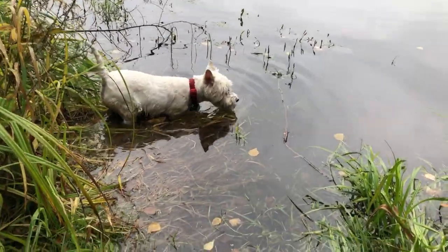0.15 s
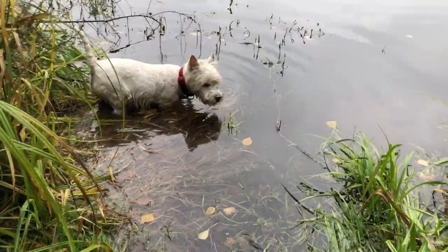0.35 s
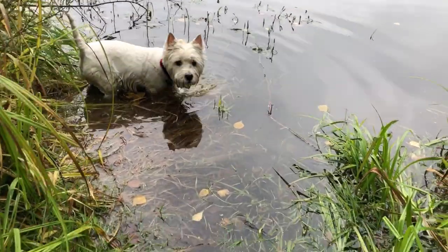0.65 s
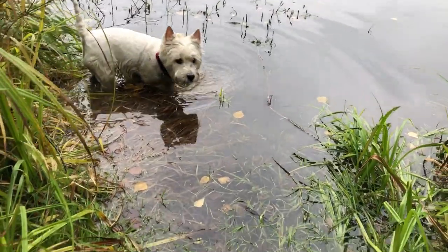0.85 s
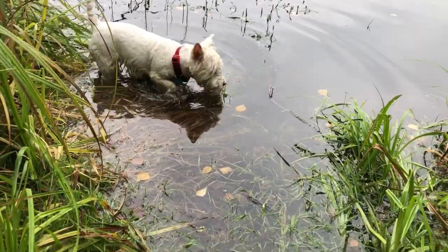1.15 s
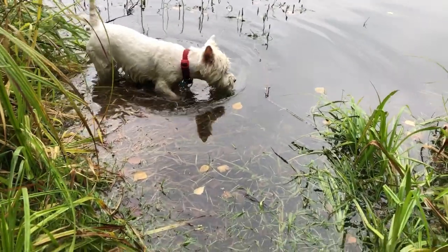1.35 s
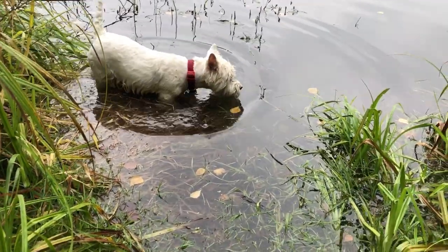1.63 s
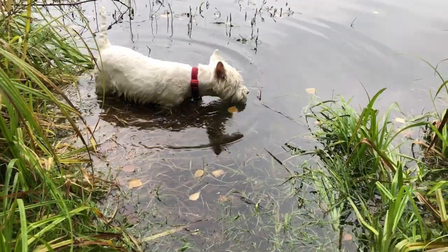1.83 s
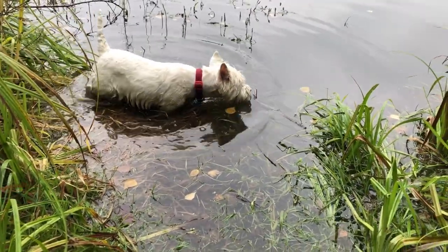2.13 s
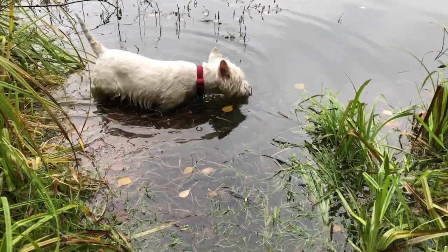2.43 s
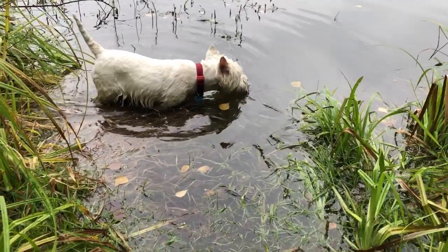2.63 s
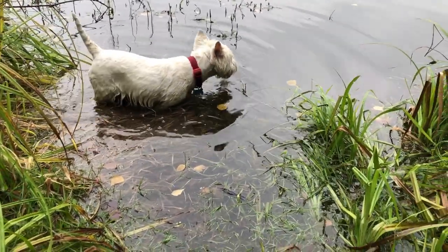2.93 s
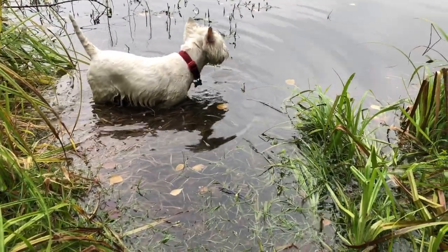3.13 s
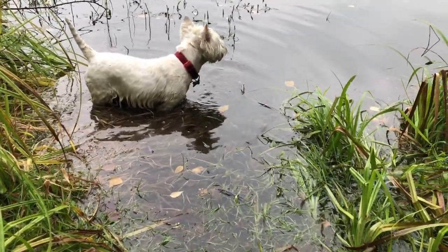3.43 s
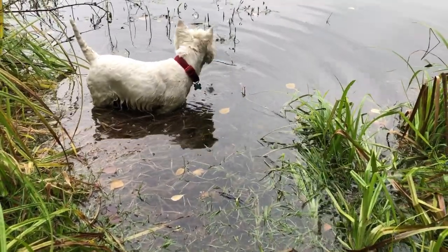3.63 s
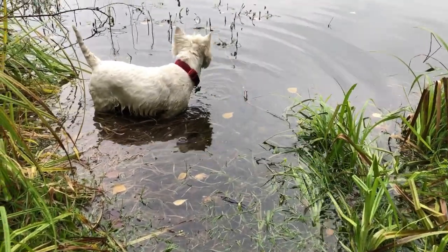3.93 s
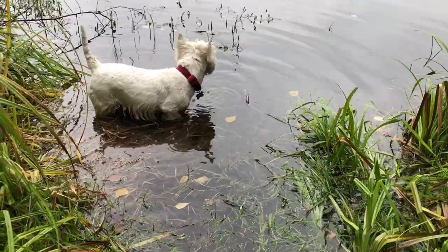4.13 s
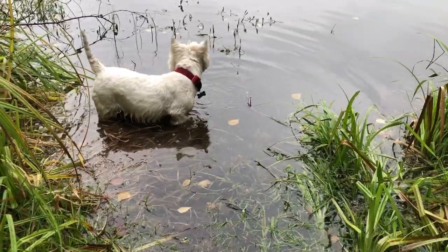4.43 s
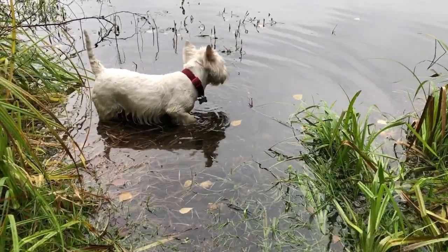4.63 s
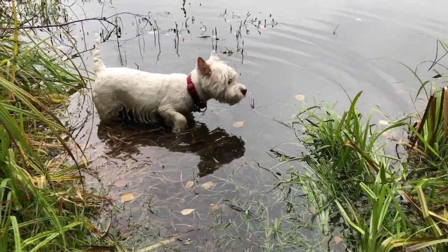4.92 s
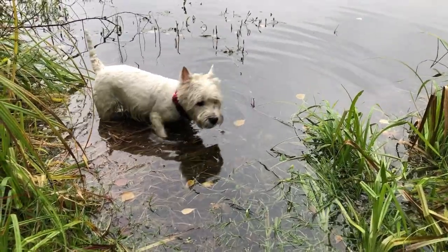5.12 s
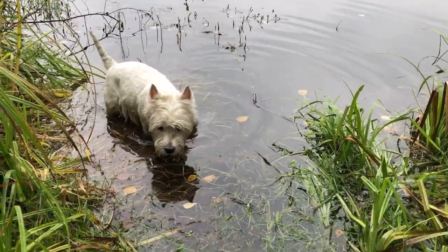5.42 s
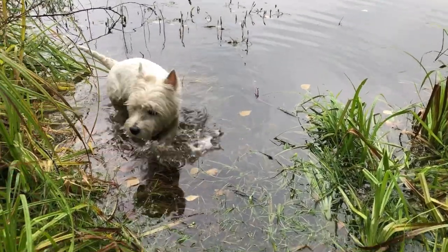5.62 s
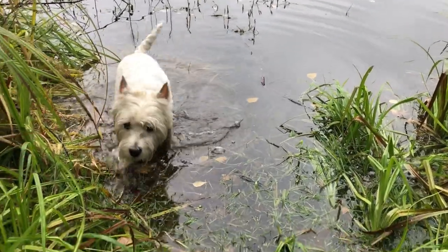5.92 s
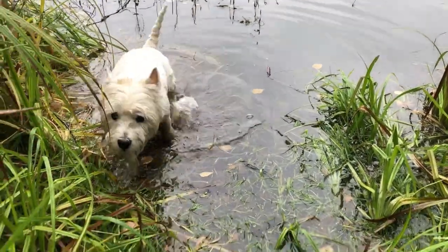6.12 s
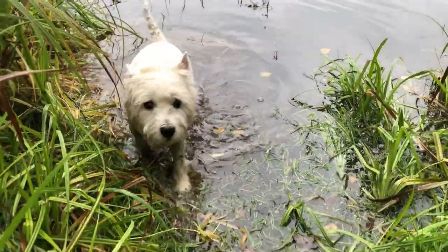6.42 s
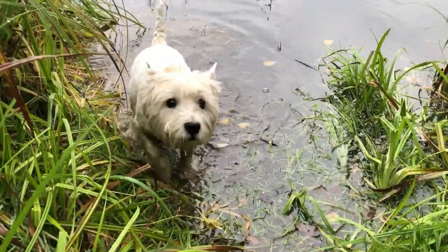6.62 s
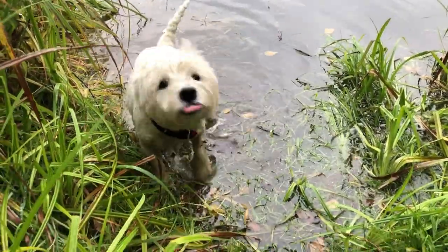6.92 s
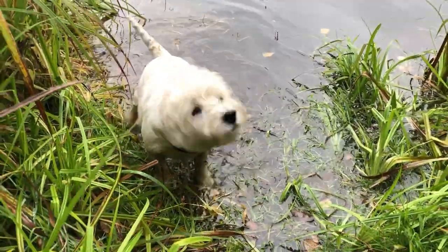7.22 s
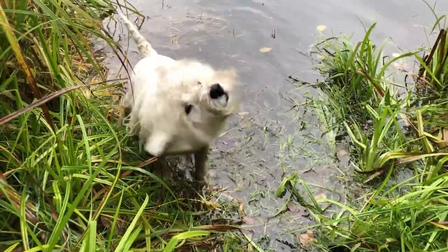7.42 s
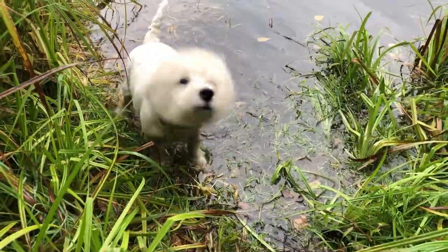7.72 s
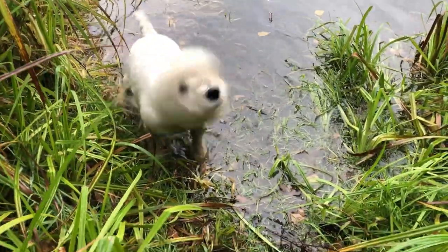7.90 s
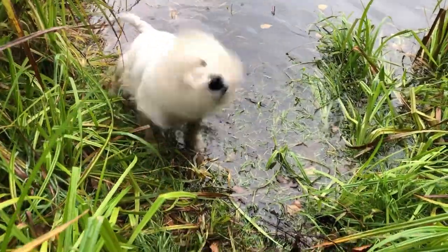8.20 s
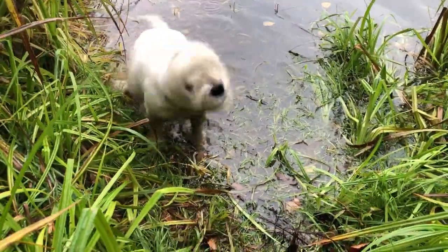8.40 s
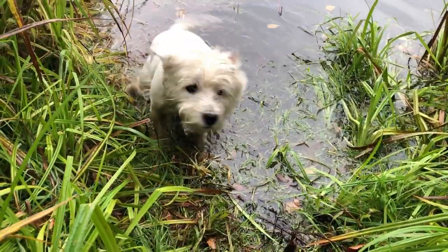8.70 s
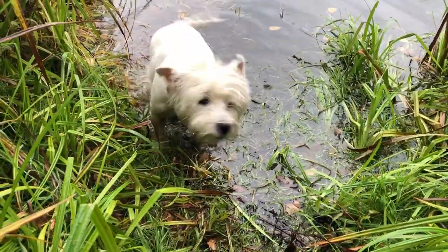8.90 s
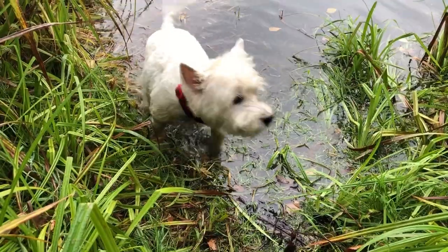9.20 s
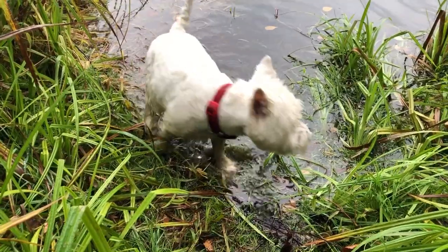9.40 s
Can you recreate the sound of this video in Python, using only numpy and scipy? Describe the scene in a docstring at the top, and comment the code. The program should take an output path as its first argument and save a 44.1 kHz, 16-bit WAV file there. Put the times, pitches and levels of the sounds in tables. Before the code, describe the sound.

Sparse gurgles and plops in a quiet pond give way to splashing steps, then a dog's spattering shake, ear slaps and metal tag jingles.

```python
"""A small dog wades in a shallow pond, climbs towards the grassy bank and shakes itself dry.
First its legs stir up gurgling bubbles, and single drops plop and splat; bigger steps then throw up spray.
Near the end metal collar tags jingle, wet ears clap and water flies off as the dog shakes.
Far traffic and leaves sound throughout. Bubbles and tags are sines; spray, splats and air are shaped noise,
with swarms of tiny bubbles in the water."""
import sys
import numpy as np
from scipy import signal
from scipy.fft import rfft, irfft, next_fast_len
from scipy.io import wavfile
from scipy.ndimage import map_coordinates

SR = 44100
rng = np.random.default_rng(int(sys.argv[2]) if len(sys.argv) > 2 else 0)


def volts_from_decibels(level):
    """Turn decibel levels (scalar or array-like) into linear amplitude factors."""
    exponent = np.asarray(level, float) / 20
    return 10 ** exponent


def dump_mix(stems):
    """Bounce the given channels to the path in sys.argv[1] as a 16-bit WAV at rate SR."""
    frames = np.atleast_2d(stems).T  # one column per channel
    limited = np.clip(frames, -1, 1)  # hard clip at full scale
    pcm = np.round(limited * 32767).astype(np.int16)
    wavfile.write(sys.argv[1], SR, pcm)


N = 421155  # length of the scene in samples

# colour of flying spray: (frequency [Hz], relative level [dB])
SPRAY_COLOUR = [(700, -30), (1500, 0), (3000, -0.5), (6000, -2), (9000, -16), (13000, -38)]


def unit(x):
    """Scales x to an rms of 1."""
    return x / np.sqrt(np.mean(x ** 2) + 1e-20)


def coloured(x, points):
    """Filters x through a spectrum given as (frequency [Hz], level [dB]) points."""
    size = next_fast_len(N + 8192)
    hz, db = np.transpose(points)
    bins = np.fft.rfftfreq(size, 1 / SR)
    curve_db = np.interp(np.log(bins + 1), np.log(hz + 1), db)
    return irfft(rfft(x, size) * volts_from_decibels(curve_db), size)[:N]


def coloured_noise(points):
    """Steady random noise of the given colour, at rms 1."""
    return unit(coloured(rng.standard_normal(N), points))


def wobble(rate):
    """A smooth random curve through `rate` random points a second."""
    knots = rng.standard_normal(int(N * rate / SR) + 4)
    return map_coordinates(knots, [np.arange(N) * rate / SR])


def laid(start, rows):
    """Adds each row of samples in at its start time [s]."""
    first = np.round(start * SR).astype(int)[:, None]
    at = (first + np.arange(rows.shape[1])).clip(0, N)
    return np.bincount(at.ravel(), rows.ravel(), N + 1)[:N]


def ramps(start, end, db, rise_db_per_s, fall_db_per_s):
    """Gain of events that rise to their level, hold it from start to end and fall away; powers add."""
    t = np.arange(0, N + 64, 64) / SR  # every 64 samples is fine enough
    early = np.maximum(start[:, None] - t, 0)
    late = np.maximum(t - end[:, None], 0)
    rise = np.reshape(rise_db_per_s, (-1, 1)) * early
    fall = np.reshape(fall_db_per_s, (-1, 1)) * late
    together = np.linalg.norm(volts_from_decibels(db[:, None] - rise - fall), axis=0)
    return np.interp(np.arange(N) / SR, t, together)


def bubbles(start, gain, hz, glide, swell, life, size):
    """Sines that swell, die by 13 dB within their life, and glide as the air pocket changes shape."""
    t = np.arange(size) / SR
    hz, glide = hz[:, None], glide[:, None]
    swell, life = swell.clip(1e-4)[:, None], life.clip(2e-4)[:, None]
    pitch = hz * 2 ** (glide * np.minimum(t / life, 1.1))  # glide in octaves per life
    rising = np.sin(np.pi / 2 * np.minimum(t / swell, 1)) ** 2
    since_swell = np.maximum(t - swell, 0) / np.maximum(life - swell, .3 * life)
    dying = volts_from_decibels(-13 * since_swell ** 1.45)
    tone = np.sin(2 * np.pi * np.cumsum(pitch, 1) / SR)
    return laid(start, gain[:, None] * rising * dying * tone)


def swarm(count, hz, spread, cycles, scatter_db, size):
    """Bubbles at random times with pitches scattered around hz, a few much louder than the rest; rms 1."""
    when, long, loud, glide = rng.random((count, 4)).T
    pitch = np.clip(hz * np.exp(spread * rng.standard_normal(count)), 250, 15500)
    gain = volts_from_decibels(-scatter_db * np.log(1 - loud).clip(-2.5, 0))
    life = cycles * (0.35 + long) / pitch  # high bubbles are short
    return unit(bubbles(when * N / SR, gain, pitch, .55 * (glide - .4), 0.19 * life, life, size))


def stirred_water():
    """Legs and shaken fur stir the water: gurgling bubbles on a wash, droplets and fine mist in clumps."""
    # how busy the water is between single splashes, before random surges:
    # (time [s], gurgle level [dB], spray level [dB], mist above spray [dB])
    bustle = [(0.0, -68.5, -71, 3), (1.0, -73, -77, 2), (2.2, -74, -86, 10), (3.2, -72, -80, 7),
              (4.0, -74, -93, 9), (5.44, -74, -93, 9), (5.52, -63, -59, -4), (6.02, -63, -61, -6),
              (6.25, -61, -57, -2), (6.45, -65, -63, -2), (6.85, -72, -67, 0), (7.08, -74, -71, 8),
              (7.45, -71, -70, 5), (7.9, -58, -62, 5), (8.15, -63, -66, 4), (8.45, -60, -60, 1),
              (9.1, -62, -62, 2), (9.4, -74, -65, 2), (9.55, -70, -61, 7)]
    # a leg drags air under: (start [s], length [s], gurgle level [dB])
    strides = [(1.1, .15, -59), (1.665, .07, -53), (1.76, .03, -62), (2.42, .03, -60), (2.70, .02, -57),
               (5.51, .21, -50), (5.93, .05, -61), (6.07, .18, -59), (6.38, .03, -57.5), (6.56, .03, -57),
               (6.94, .03, -55), (8.675, .075, -50.5), (8.79, .03, -55)]
    # water thrown up by a leg or a swing of the shaking body:
    # (time of peak [s], spray level [dB], mist above spray [dB], time to fall by 10 dB [s])
    throws = [(1.11, -67, 0, .04), (1.68, -63, -9, .07), (1.805, -62, -12, .02), (2.462, -61, -10, .05),
              (2.705, -58, -14, .045), (4.08, -62, -14, .03), (4.15, -66, 2, .075), (4.835, -73, 0, .12),
              (5.26, -63, -2, .055), (5.635, -51, 3, .04), (5.745, -46, -3, .075), (5.915, -51.5, -1, .05),
              (5.99, -46, 0, .022), (6.33, -52, 3.5, .08), (6.385, -45.5, -5, .045), (6.55, -50.5, 2, .07),
              (6.675, -54, 4, .07), (6.87, -59, 5, .04), (6.965, -49.5, -6, .045), (7.225, -60, 0, .09),
              (7.65, -57, 1, .09), (7.89, -52.5, 7, .12), (8.05, -54, 4.5, .08), (8.225, -50.5, 3, .1),
              (8.365, -52, 0, .05), (8.455, -51, -2, .06), (8.59, -48, -1, .09), (8.81, -50, -3, .04),
              (8.93, -51, 0, .045), (9.02, -50.5, 1.5, .07), (9.245, -52, -3, .04), (9.331, -51, -2, .045)]
    # colours of mist and gurgle: (frequency [Hz], relative level [dB])
    mist_colour = [(3000, -13), (7000, -1.5), (12000, 1.5), (16000, 2.5)]
    gurgle_colour = [(200, -37), (400, -4), (1500, 5.5), (3000, -23.5), (5000, -39)]
    stride_rise_db_per_s, stride_fall_db_per_s = 500, 240
    throw_rise = .55  # rise time over fall time

    t = np.arange(N) / SR
    s, churn_db, spray_db, mist_over = np.transpose(bustle)
    start, length, stride_db = np.transpose(strides)
    peak, throw_db, throw_mist_over, fall = np.transpose(throws)

    def thrown(db):
        """Gain of all the throws at the given levels."""
        return ramps(peak, peak, db, 10 / (throw_rise * fall), 10 / fall)

    stepped = ramps(start, start + length, stride_db, stride_rise_db_per_s, stride_fall_db_per_s)
    churned = np.hypot(volts_from_decibels(np.interp(t, s, churn_db)), stepped)
    sprayed = np.hypot(volts_from_decibels(np.interp(t, s, spray_db)), thrown(throw_db))
    misted = np.hypot(volts_from_decibels(np.interp(t, s, spray_db + mist_over)), thrown(throw_db + throw_mist_over))

    wash = coloured_noise(gurgle_colour)
    trapped_air = swarm(count=4500, hz=950, spread=0.55, cycles=8, scatter_db=2.8, size=900)
    gurgle = unit(trapped_air + 0.55 * wash)
    droplets = swarm(count=6000, hz=3900, spread=0.5, cycles=11, scatter_db=5, size=400)
    crackle = swarm(count=2000, hz=3300, spread=0.45, cycles=2.2, scatter_db=6, size=100)
    fizz = swarm(count=4000, hz=12000, spread=0.3, cycles=7, scatter_db=5.5, size=120)

    clumps = 3 * wobble(130)  # [dB] drops land in quick bunches, shared by patter and hiss
    patter_noise = volts_from_decibels(clumps + 2.45 * wobble(60)) * rng.standard_normal(N)
    patter = unit(coloured(patter_noise, SPRAY_COLOUR))
    hiss_noise = volts_from_decibels(clumps + 1.85 * wobble(60)) * rng.standard_normal(N)
    hiss = unit(coloured(hiss_noise, mist_colour))
    spray = unit(patter + 1.4 * droplets + 0.8 * crackle)
    mist = unit(hiss + 0.5 * fizz)

    surge = volts_from_decibels(.8 * wobble(25))  # spray and mist surge together
    return churned * volts_from_decibels(2.17 * wobble(30)) * gurgle + surge * (sprayed * spray + misted * mist)


def plops():
    """Single bubbles that stand out: each starts with a wet smack and flutters in the rough surface."""
    # big bubbles and plops, before the flutter:
    # (time [s], peak level [dB], start pitch [Hz], glide [octaves], life [s])
    plop_table = [(0.6167, -54, 1450, 0.055, 0.016), (0.698, -57, 1600, 0.4, 0.016),
                  (0.894, -53, 3050, 0.03, 0.004), (1.0697, -46, 1520, -0.15, 0.016),
                  (1.1095, -43.5, 760, -0.15, 0.023), (1.1502, -47, 1005, 0.18, 0.013),
                  (1.171, -39.5, 1020, -0.098, 0.011), (1.1896, -53, 618, 1.5, 0.027),
                  (1.207, -38, 1804, 0.14, 0.0052), (1.2884, -47, 1585, 0.27, 0.03),
                  (1.643, -51, 2800, 0.05, 0.005), (1.667, -44, 610, 0.1, 0.008),
                  (1.703, -38.5, 650, -0.37, 0.0055), (1.733, -52, 1900, 0.1, 0.012),
                  (1.798, -48, 2900, 0.3, 0.008), (1.9267, -46, 1980, 0.063, 0.0076),
                  (2.444, -45, 950, 0.19, 0.0044), (2.464, -49, 4200, 0.2, 0.003),
                  (2.472, -50, 2400, 0.1, 0.003), (2.693, -45, 566, 0.36, 0.013),
                  (3.005, -44, 700, 0.29, 0.0032), (3.0055, -51, 3300, 0.0, 0.003),
                  (3.1668, -53, 1150, -0.029, 0.018), (3.288, -54.5, 1400, 1.65, 0.026),
                  (3.539, -50, 1640, 0.23, 0.012), (4.0987, -40.5, 1016, -0.089, 0.006),
                  (5.1427, -40, 960, -0.083, 0.003), (5.259, -38, 1890, 0.11, 0.0036),
                  (5.473, -50, 800, -0.1, 0.02), (5.511, -30, 650, -0.2, 0.008),
                  (5.5205, -38, 480, -0.3, 0.016), (5.553, -39, 630, -0.24, 0.0299),
                  (5.5485, -34.5, 1520, 0.15, 0.0083), (5.5953, -44, 906, -0.27, 0.0098),
                  (5.608, -36, 765, 0.26, 0.008), (5.6168, -36, 1183, 0.056, 0.0055),
                  (5.629, -43, 3300, 0.05, 0.005), (5.648, -38, 390, 0.05, 0.028),
                  (5.727, -43, 900, 0.1, 0.008), (5.753, -39, 3150, 0.1, 0.005),
                  (5.781, -41, 2750, 0.15, 0.005), (5.841, -40, 3120, 0.078, 0.006),
                  (6.069, -43, 1470, 0.6, 0.0062), (6.123, -39, 1400, 0.9, 0.01),
                  (6.163, -38.5, 650, 1.2, 0.0073), (6.105, -47, 720, 0.0, 0.02),
                  (6.188, -47, 1100, 0.3, 0.02), (6.212, -47, 750, 0.0, 0.025),
                  (6.2485, -27, 1340, -2.06, 0.0061), (6.2515, -30, 480, -0.6, 0.014),
                  (6.385, -41, 1017, -0.09, 0.006), (6.4155, -46, 1220, -0.26, 0.015),
                  (6.573, -49, 1919, 0.0, 0.015), (6.724, -43.5, 2300, -0.11, 0.0035),
                  (6.786, -45, 2180, -0.17, 0.006), (6.9501, -18, 1800, -0.4, 0.0016),
                  (6.953, -40, 1300, -1, 0.006), (6.962, -42, 740, -0.63, 0.014),
                  (7.021, -47.5, 1500, 0.29, 0.014), (7.133, -50, 2220, 0.45, 0.013),
                  (7.284, -46.5, 1940, 0.0, 0.0038), (7.454, -45.5, 1990, 0.14, 0.005),
                  (8.098, -39.5, 2170, 0.1, 0.005), (8.365, -36.5, 2130, 0.26, 0.0078),
                  (8.372, -37, 1200, -0.086, 0.006), (8.472, -40, 1800, -0.1, 0.009),
                  (8.576, -30, 980, -0.15, 0.01), (8.59, -30, 2220, 0.17, 0.0042),
                  (8.629, -31.5, 1290, -0.066, 0.0022), (8.647, -28.5, 1170, 0.0, 0.0061),
                  (8.6503, -20.5, 586, -0.08, 0.014), (8.675, -33, 800, -0.1, 0.005),
                  (8.682, -31, 760, -0.1, 0.005), (8.706, -35, 760, -0.7, 0.013),
                  (8.725, -38, 480, 0.0, 0.006), (8.731, -42, 1150, 0.15, 0.011),
                  (8.736, -36, 620, -0.14, 0.012), (8.756, -32, 290, 1.1, 0.023),
                  (8.762, -45, 1700, 0.3, 0.007), (8.789, -42, 1150, 0.2, 0.006),
                  (8.8, -41, 1890, 1.0, 0.01), (8.816, -43.5, 810, 0.1, 0.0096),
                  (9.318, -23, 3900, -0.05, 0.005), (9.445, -44, 1110, 0.0, 0.0059)]
    s, db, hz, glide, life = np.transpose(plop_table)
    upward = glide.clip(0, 1)
    swell = life * (0.15 + 0.4 * upward ** 2)  # those that glide far up swell slowly
    smack_db = db - 16 - 12 * upward  # and smack more softly
    smack_fall = 60 * np.arange(800) / SR / 0.016  # 60 dB in 16 ms
    smack = laid(s, volts_from_decibels(smack_db[:, None] - smack_fall))
    flutter = volts_from_decibels(1.3 * wobble(300))
    ringing = bubbles(s, volts_from_decibels(db), hz, glide, swell, life, size=3000)
    return flutter * ringing + smack * coloured_noise(SPRAY_COLOUR)


def splats():
    """Each drop is a burst of noise: a sharp wide crack, and a duller part around the drop's own pitch."""
    # drops and slaps bursting on water and leaves, before a common lift of 1 dB:
    # (time [s], level [dB], centre frequency [Hz])
    splat_table = [(1.0682, -47, 3760), (1.7873, -45, 2600), (2.6932, -42, 2200), (3.6554, -54, 5200),
                   (5.1405, -54.5, 3520), (5.201, -48, 12000), (5.218, -54, 6500), (5.232, -53, 8500),
                   (5.242, -51, 14000), (5.2714, -36, 3600), (5.509, -42.5, 3550), (5.6438, -39, 2780),
                   (5.7059, -42, 5340), (5.7227, -38, 4810), (5.7418, -39, 5220), (5.876, -43, 5000),
                   (5.923, -36.5, 4090), (5.9755, -34, 5060), (6.3625, -47, 2800), (6.3774, -29, 2450),
                   (6.6811, -37.5, 5400), (6.79, -44.5, 9200), (6.851, -46, 11000), (6.990, -40, 12000),
                   (7.226, -36, 4100), (7.369, -46, 6440), (7.455, -42.5, 5350), (7.607, -46, 6430),
                   (7.86, -48, 3780), (8.0386, -31, 7460), (8.1354, -38, 5960), (8.209, -38, 2300),
                   (8.2287, -38, 3800), (8.249, -37, 7100), (8.2796, -31, 3600), (8.315, -37.5, 3700),
                   (8.335, -38, 2200), (8.356, -37, 4140), (8.4412, -29, 4300), (8.5655, -37, 2200),
                   (8.5874, -34.5, 7900), (8.628, -38, 2700), (8.6467, -33, 3200), (8.742, -38, 8000),
                   (8.9043, -37, 3860), (8.947, -30, 3850), (9.005, -38, 3500), (9.0488, -38, 2800),
                   (9.0982, -33.5, 7640), (9.206, -40, 3500), (9.3175, -25, 4600), (9.4397, -41.5, 4200)]
    s, db, hz = (c[:, None] for c in np.transpose(splat_table))
    t = np.arange(2048) / SR
    f = np.fft.rfftfreq(2048, 1 / SR) + 1
    own_pitch = np.exp(-(np.log(f / hz) / 0.42) ** 2)
    crack = 0.33 * f ** 2 / (f ** 2 + 4000 ** 2)
    noise = irfft(rfft(rng.standard_normal((len(s), len(t)))) * (own_pitch + crack))
    burst = (1 - np.exp(-(t / 0.00065) ** 2)) * volts_from_decibels(-60 * t / 0.021)
    noise *= burst
    # every burst gets the same energy before its level is set
    noise *= np.linalg.norm(burst) / np.linalg.norm(noise, axis=1, keepdims=True)
    return laid(s[:, 0], volts_from_decibels(db + 1.0) * noise)


def ear_flaps():
    """Wet ears slap the head: short hollow claps of one length, each with a rough slap of fur and a thud."""
    # ear slaps, a run about 0.08 s apart and two later ones:
    # (time [s], clap peak level [dB], clap pitch [Hz])
    flaps = [(7.992, -42, 900), (8.084, -43, 680), (8.173, -43, 660), (8.258, -37.5, 680),
             (8.34, -36.5, 690), (8.419, -39, 760), (8.496, -36.5, 670), (9.036, -42, 570),
             (9.126, -41, 643)]
    # colour of wet fur slapping: (frequency [Hz], relative level [dB])
    fur_colour = [(300, -30), (700, 0), (2000, -4), (5000, -20)]
    life_s, glide_octaves = .0048, -.12
    fur_db, fur_t60_s = -4, .02  # fur level relative to the clap
    thud_db, thud_hz = -10, 170  # thud level relative to the clap

    s, db, hz = np.transpose(flaps)
    life = np.full(len(s), life_s)
    clap = bubbles(s, volts_from_decibels(db), hz, 0 * s + glide_octaves, 0.2 * life, life, size=1000)
    thud = bubbles(s, volts_from_decibels(db + thud_db), 0 * s + thud_hz, 0 * s, 1.5 * life, 5 * life, size=2000)
    fur_fall = 60 * np.arange(1500) / SR / fur_t60_s
    slap = laid(s - .003, volts_from_decibels(db[:, None] + fur_db - fur_fall))  # the fur slaps 3 ms early
    return clap + thud + slap * coloured_noise(fur_colour)


def tags():
    """Thin metal tags knock together; each blow favours one mode and fur soon damps the ring."""
    # ways the metal rings: (frequency [Hz], time to fall by 60 dB [s], offset of a weaker twin [Hz])
    mode_table = [(11855, .065, 75), (3790, .2, 20), (10355, .08, 120), (15245, .08, -60), (8420, .1, 45)]
    # knocks, at nominal levels: (time [s], level of the favoured mode [dB], its rough frequency [Hz],
    # how far the others lie under it [dB], time until fur stops the ring [s])
    blows = [(7.04, -58, 8400, 25, 0.045), (7.075, -59, 3800, 28, 0.065), (7.12, -60, 11900, 4, 0.04),
             (7.175, -52, 3800, 23, 0.029), (7.226, -46, 3800, 8, 0.007), (7.232, -49, 10400, 9, 0.04),
             (7.325, -60, 15200, 4, 0.03), (7.43, -60, 8400, 20, 0.015), (7.484, -57, 3800, 4, 0.012),
             (7.61, -52, 11900, 14, 0.025), (7.666, -54, 3800, 5, 0.015), (7.773, -54, 3800, 12, 0.011),
             (7.815, -57, 10400, 12, 0.03), (7.835, -54, 3800, 15, 0.008), (7.861, -49.5, 3800, 10, 0.012),
             (8.135, -47, 15200, 10, 0.03), (8.251, -30, 11900, 5, 0.032), (8.266, -28.5, 11900, 12, 0.03),
             (8.365, -49, 10400, 5, 0.024), (8.48, -50, 10400, 4, 0.022), (8.508, -51, 10400, 12, 0.02),
             (8.547, -34.5, 11900, 12, 0.015), (8.594, -43.5, 8400, 18, 0.009),
             (8.743, -26.5, 11900, 19, 0.011), (8.785, -46, 10400, 18, 0.0073),
             (9.016, -48, 15200, 8, 0.05), (9.05, -55, 11900, 4, 0.034), (9.098, -41, 11900, 9, 0.016)]
    # span of light jingling: (from [s], to [s], loudest nominal level [dB])
    jingle_from, jingle_to, jingle_db = (7.1, 9.15, -57)
    # two low modes all but vanish unless favoured: (loss of each mode in turn [dB])
    shy_db = [0, 24, 0, 0, 24]
    # random stray of each mode's pitch from blow to blow: (typical share of its frequency [ratio])
    wander = [.0015, .007, .003, .002, .006]

    chance = rng.random((85, 5))  # 85 light knocks, with the same columns as the blows
    light = np.c_[jingle_from + (jingle_to - jingle_from) * chance[:, 0],
                  jingle_db - 18 * chance[:, 1],
                  9500 + 5500 * chance[:, 2] ** 2,
                  14 * chance[:, 3],
                  .006 + .016 * chance[:, 4]]
    rows = np.r_[blows, light]
    t = np.arange(4000) / SR
    s, db, near_hz, under, stop = (c[:, None] for c in rows.T)
    mode_hz = np.array(mode_table)[:, 0]
    nearest = np.abs(np.log(near_hz / mode_hz)).argmin(axis=1)
    favoured = nearest[:, None] == np.arange(len(mode_hz))
    loss = under + shy_db + 1.5 * rng.standard_normal(favoured.shape)
    levels = db - ~favoured * loss  # only the modes not favoured lose level

    onset = 1 - np.exp(-t / 0.0033)
    damping = 1 / (1 + np.exp(np.clip((t - stop) / 0.0017, -50, 50)))
    envelope = onset * (0.09 + damping)  # a faint ring outlasts the damping
    rings = 0
    for k, (hz, t60, split_hz) in enumerate(mode_table):
        struck_hz = hz * (1 + wander[k] * rng.standard_normal((len(s), 1)))
        main = 1.4 * np.sin(2 * np.pi * struck_hz * t)
        twin = 0.75 * np.cos(2 * np.pi * (struck_hz + split_hz) * t)
        pair = main - twin  # two close pitches beat
        rings = rings + volts_from_decibels(levels[:, k:k + 1] - 60 * t / t60) * pair
    return laid(s[:, 0], envelope * rings)


def surface_ticks():
    """Tiny films burst on the surface now and then, and small drips fall from the fur."""
    films = swarm(count=170, hz=12700, spread=0.29, cycles=3.7, scatter_db=2.5, size=100)
    drips = swarm(count=110, hz=4200, spread=0.5, cycles=9, scatter_db=5, size=300)
    return volts_from_decibels(-80) * films + volts_from_decibels(-83) * drips


def bank_echo(x):
    """A short scatter off water surface and reeds: x smeared by a quickly fading noise tail."""
    t = np.arange(3000) / SR
    tail = rng.standard_normal(len(t)) * volts_from_decibels(-60 * t / 0.022)
    return signal.fftconvolve(x, tail / np.linalg.norm(tail))[:N]


def air():
    """Far traffic and leaves: mostly low noise that drifts slowly in level."""
    # colour of far rumble and air: (frequency [Hz], relative level [dB])
    air_colour = [(25, -22), (64, 0), (217, -9.5), (326, -17), (531, -22), (641, -25.5), (796, -21),
                  (2110, -38.5), (3920, -41.5), (7510, -46.5), (16000, -54.5)]
    drift_db = .6 * wobble(1.46)
    return volts_from_decibels(-53.47 + drift_db) * coloured_noise(air_colour)


def scene():
    """The dog and its surroundings, in one channel."""
    near = plops() + ear_flaps() + splats() + tags()
    echo = volts_from_decibels(-11) * bank_echo(near)
    return (near + echo + stirred_water() + surface_ticks() + air())[None]


def low_pass(x):
    """Removes everything above the highest recorded frequency."""
    return signal.sosfilt(signal.butter(12, 16990, fs=SR, output="sos"), x)


def record(dry):
    """Limits the band: the treble drops steeply above 15800 Hz."""
    band_limit = [(20, 0), (15800, 0), (15950, -36), (17000, -50)]  # (frequency [Hz], level [dB])
    finished = coloured(dry[0], band_limit)[None]
    return low_pass(finished)


dry = scene()
out = record(dry)
dump_mix(out)
```